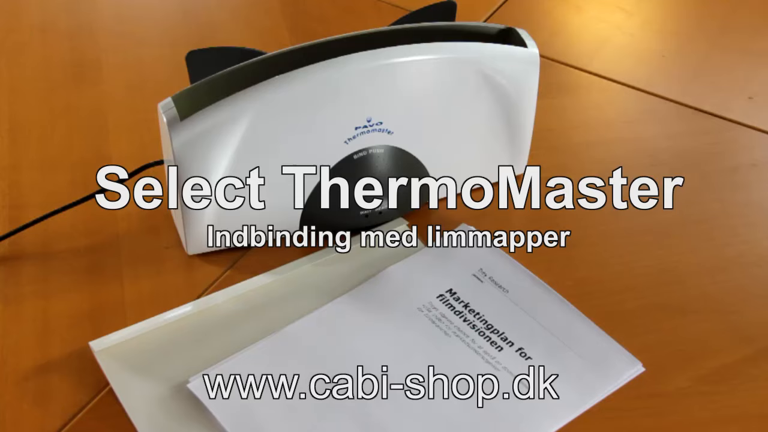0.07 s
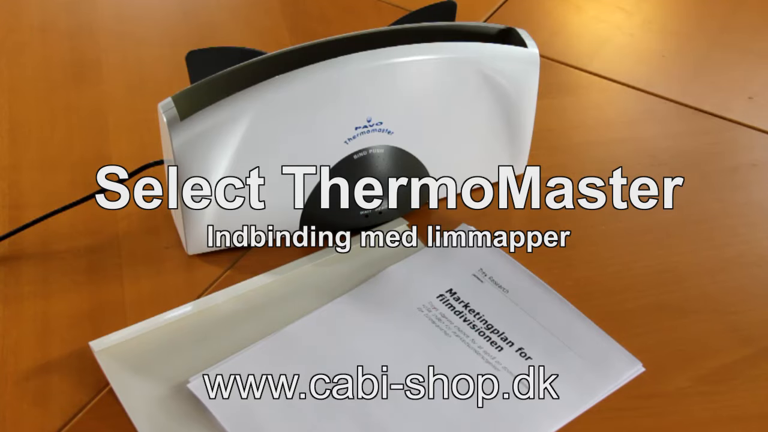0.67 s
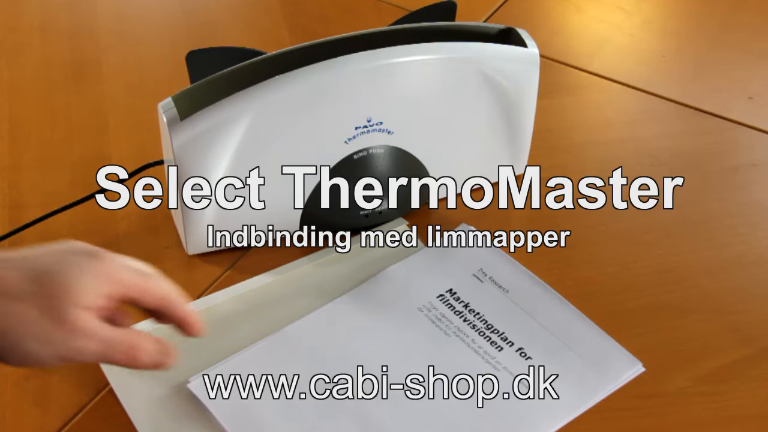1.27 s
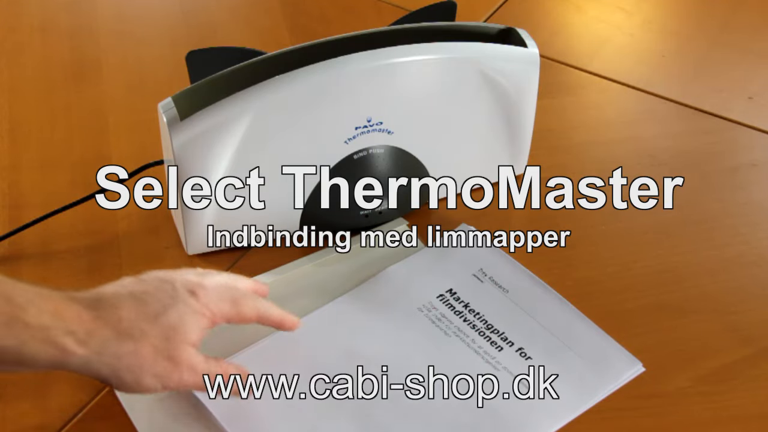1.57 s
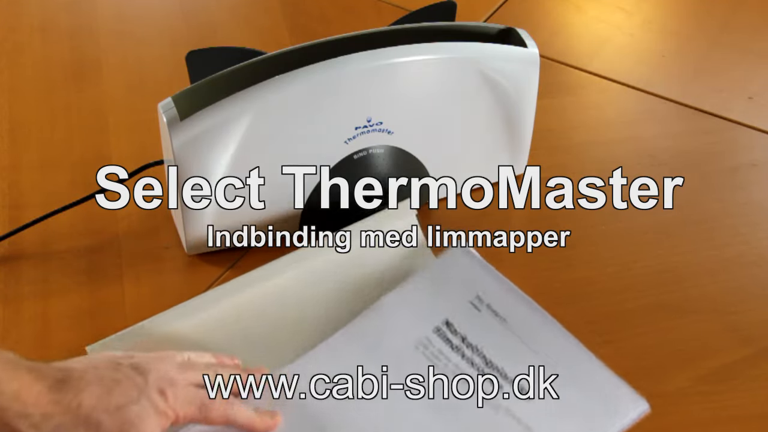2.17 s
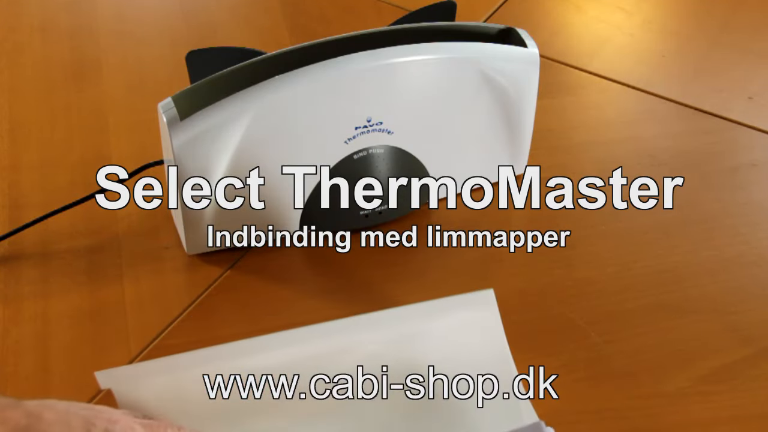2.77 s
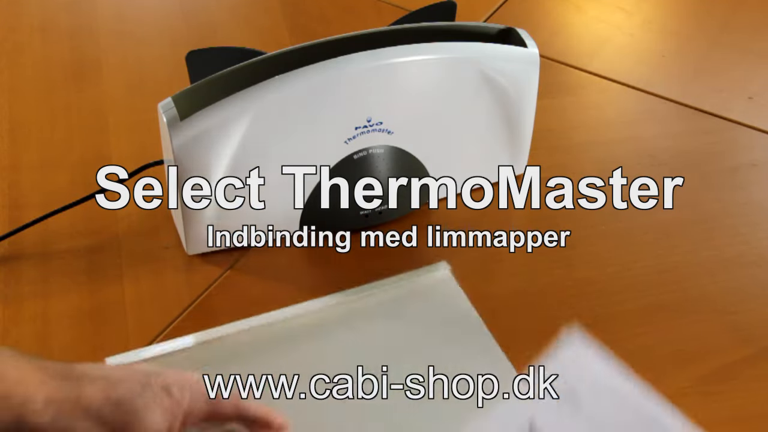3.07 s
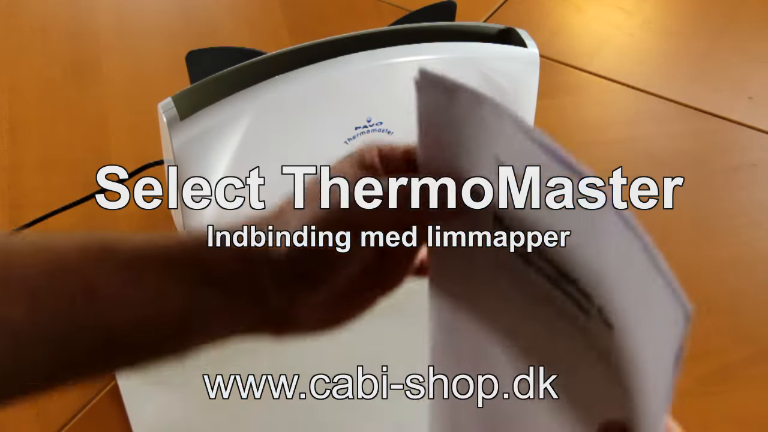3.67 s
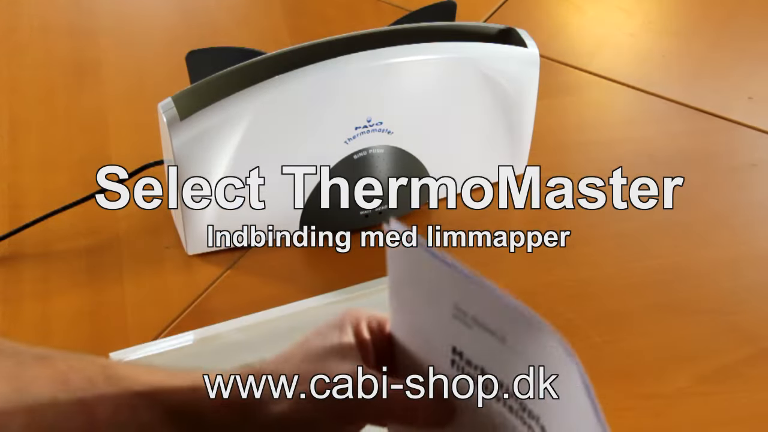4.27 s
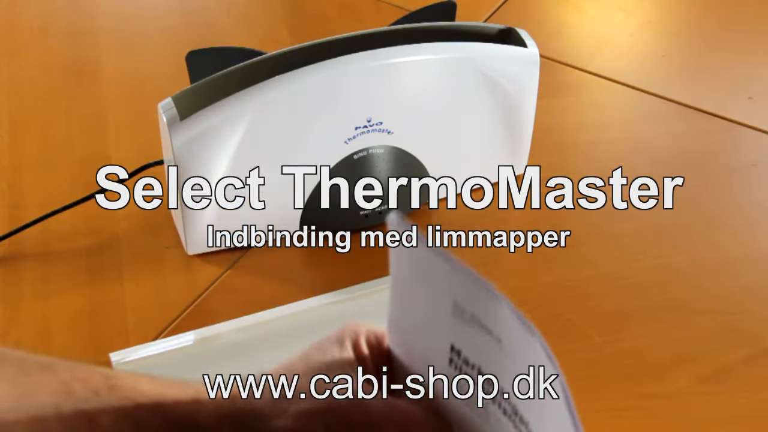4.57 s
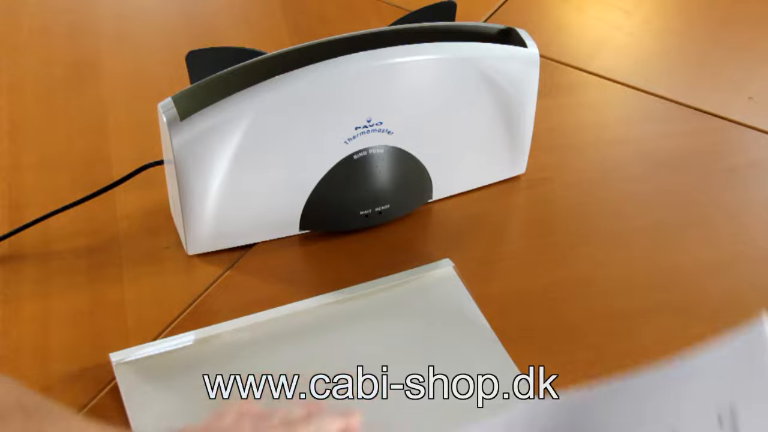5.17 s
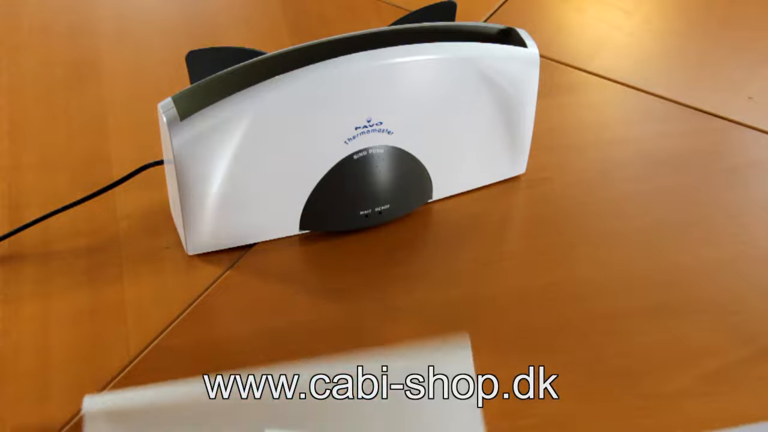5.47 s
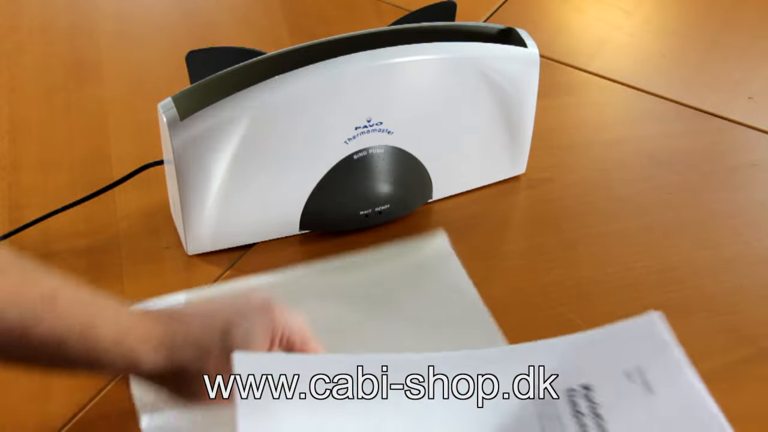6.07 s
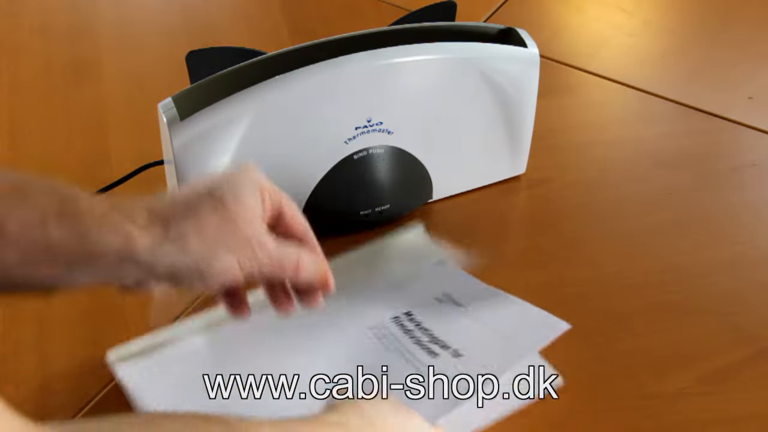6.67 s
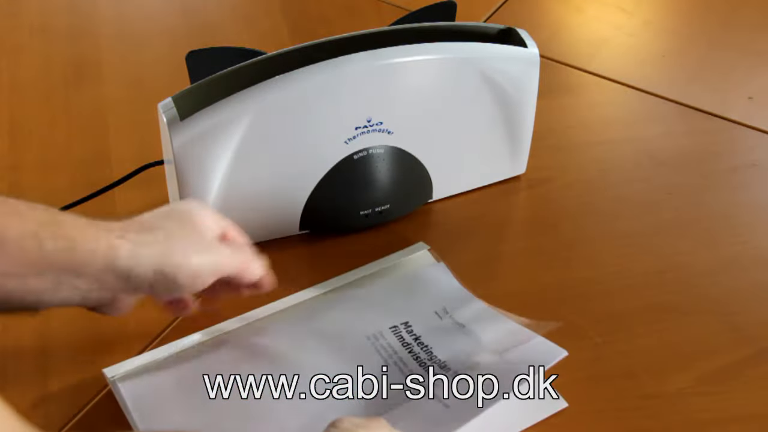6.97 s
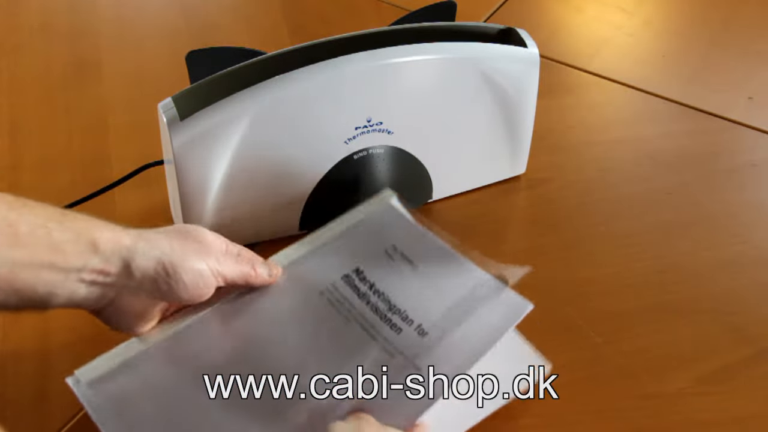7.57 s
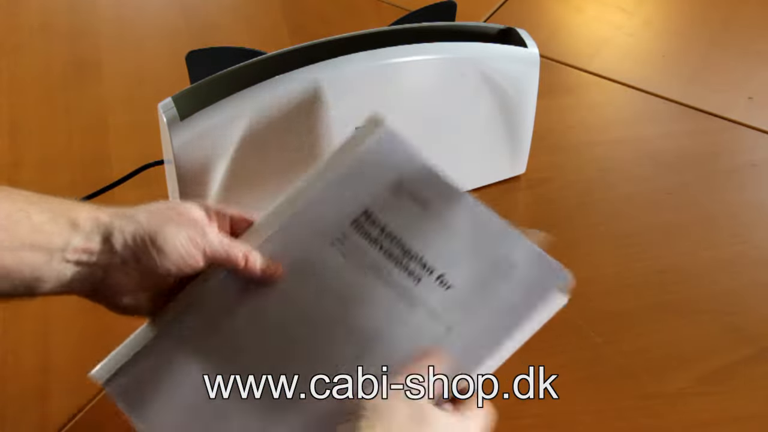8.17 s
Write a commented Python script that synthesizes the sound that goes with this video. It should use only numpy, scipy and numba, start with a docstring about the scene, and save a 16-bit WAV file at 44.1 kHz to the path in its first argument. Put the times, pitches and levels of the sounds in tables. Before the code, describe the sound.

Paper rustles and slides, then a stack of sheets is knocked four times on a wooden table in a slightly echoing room.

```python
"""A stack of paper is pulled off a plastic cover, knocked square four times on a wooden table, slid back in.
Each knock makes the table top ring, claps the air under the stack and cracks the sheet edges.
Sliding sheets rustle, hiss, whistle and tick as their fibres catch and slip.
Around it is an echoing room with ventilation noise, a machine hum and a deep drone.
An automatic volume control turns the sound down after each knock and lets it creep back."""
import sys
import numpy as np
from scipy import signal
from scipy.fft import rfft, irfft, next_fast_len
from scipy.io import wavfile
from scipy.ndimage import uniform_filter1d
from numba import njit

SR = 44100
rng = np.random.default_rng(int(sys.argv[2]) if len(sys.argv) > 2 else 0)


def store_wav(level_fs):
    """Save 16-bit WAV to argv[1]."""
    pcm = np.round(np.clip(np.atleast_2d(level_fs), -1, 1) * 32767)
    wavfile.write(sys.argv[1], SR, pcm.T.astype(np.int16))


N = 371322
T = np.arange(N) / SR

# pushes of one sheet over another: start/s, rise/s, hold/s, fade/s, relative rustle/dB, relative hiss/dB
STROKES = [(.72, 0.086, 0.024, .12, -59, -57), (.88, 0.17, 0.7, .3, -56.5, -57),
           (1.78, 0.093, .3, .2, -54, -53.5), (2.1, .24, .27, 0.33, -39.5, -42),
           (2.62, 0.046, 0.013, 0.19, -32, -41), (2.8, 0.13, .14, 0.18, -44.5, -45),
           (3.29, 0.05, 0.044, .15, -54.5, -50.5), (3.46, 0.014, 0.027, 0.12, -46, -43),
           (3.52, 0.07, .11, 0.19, -42.5, -41), (4.93, .07, 0.14, .12, -56, -46),
           (5.26, 0.24, 0.12, .2, -34.5, -39), (5.8, 0.068, .32, 0.13, -38, -36.5),
           (5.85, 0.11, .06, .35, -44.5, -35), (6.2, .07, .43, 0.088, -51, -55.5),
           (6.745, 0.01, .045, 0.094, -37, -31), (6.77, .025, 0.0062, 0.24, -36, -51),
           (7.07, .08, 0.045, 0.045, -43, -57), (7.185, .012, .14, 0.064, -37, -37.5),
           (7.2, .11, .03, 0.2, -34.5, -50), (7.52, 0.033, .015, 0.25, -43.5, -51.5),
           (7.75, .11, .03, .14, -44.5, -52), (7.93, .06, .008, .02, -34, -47.5),
           (8, 0.048, 0.092, 0.11, -48.5, -60), (8.12, 0.068, .11, .16, -44.5, -44)]


def undb(db):
    """Turn decibels into a number to multiply by."""
    return 10 ** (np.asarray(db) / 20)


def unit(x):
    """Scale a sound to an average strength (rms) of 1."""
    return x / np.sqrt(np.mean(x ** 2))


def lowpass(x, hz, order=2):
    """Soften everything above hz."""
    return signal.sosfilt(signal.butter(order, min(hz, SR / 2 - 1), fs=SR, output="sos"), x)


def highpass(x, hz, order=2):
    """Soften everything below hz."""
    return signal.sosfilt(signal.butter(order, hz, "high", fs=SR, output="sos"), x)


def colour(x, points):
    """Shape the bass and treble of a sound along a curve of points: f/Hz, level/dB."""
    hz, db = np.transpose(points)
    size = next_fast_len(len(x) + 4096, True)
    f = np.maximum(np.fft.rfftfreq(size, 1 / SR), 1)
    cepstrum = irfft(np.log(undb(np.interp(np.log(f), np.log(hz), db))), size)
    # fold it in half so that the filter rings only after a click, never before
    cepstrum[1:size // 2] *= 2
    cepstrum[size // 2 + 1:] = 0
    return irfft(rfft(x, size) * np.exp(rfft(cepstrum)), size)[:len(x)]


def wander(rate):
    """A random curve, roughly 1 in size, that heads for a new value rate times a second."""
    knots = rng.standard_normal(N // 100)
    return 1.18 * np.interp(T * rate, np.arange(len(knots)), knots)


def add(track, s, sound):
    """Mix a sound into the track at s seconds."""
    i = int(s * SR)
    track[i:i + len(sound)] += sound[:len(track) - i]


def ring(hz, t60):
    """Half a second of a tone that dies away by 60 dB in t60 seconds."""
    t = T[:SR // 2]
    return np.sin(2 * np.pi * hz * t) * np.exp(-np.log(1000) * t / t60)


def pushes(rows, column=0, rise_db=17.5, fade_db=20.5):
    """Loudness of a row of pushes: each swells by rise_db, holds, then sinks by fade_db per fade time."""
    power = np.zeros(N)
    for start, rise, hold, fade, *levels in rows:
        early = np.maximum(start + rise - T, 0) / rise
        late = np.maximum(T - start - rise - hold, 0) / fade
        power += undb(np.maximum(levels[column] - rise_db * early - fade_db * late, -150)) ** 2
    return np.sqrt(power)


def ventilation(level_db=-42):
    """Moving air makes a soft, low rush."""
    # tone colour of the air: f/Hz, relative level/dB
    air_colour = [(20, -33), (38, -27), (58, -10), (82, -23), (130, -7), (220, -3), (370, -10), (850, -12),
                  (1250, -14), (1680, -15), (2050, -21), (5000, -29), (11000, -38.5), (16000, -42)]
    return undb(level_db) * unit(colour(rng.standard_normal(N), air_colour)) * undb(0.99 * wander(16))


def machine_hum(waver_db=1, drift_hz=0.96):
    """A machine hums with a few tones that waver in loudness and pitch."""
    # tones of the hum: f/Hz, level/dB
    tones = [(120, -50), (829, -60.5), (1540, -58.5), (1663, -57.5)]
    out = np.zeros(N)
    for hz, db in tones:
        peak = np.sqrt(2) * undb(db - waver_db * wander(5))
        out += peak * np.sin(2 * np.pi * np.cumsum(hz + drift_hz * wander(8)) / SR)
    return out


def drone(mains_hz=50, mains_db=-6):
    """A deep wandering tone throbs against a mains hum; both swell and fade together."""
    # path of the deep tone: t/s, f/Hz, level/dB
    path = [(0, 54.5, -52), (2, 55, -54), (3, 57, -56), (4.8, 63.3, -51), (5.4, 63.4, -46.5),
            (6.9, 60, -49), (7.3, 60, -62), (8.42, 60, -67)]
    s, hz, db = np.transpose(path)
    tone = np.sin(2 * np.pi * np.cumsum(np.interp(T, s, hz) + wander(1.8)) / SR)
    mains = undb(mains_db) * np.sin(2 * np.pi * mains_hz * T)
    return (tone + mains) * undb(np.interp(T, s, db))


def room(x, wet_db, t60=.52, treble_t60=0.51, build_s=0.0051):
    """Bare walls send back a wash of echoes that builds quickly and dies in about half a second."""
    walls = [(45, -32), (120, -1.0), (400, -3.5), (1200, -6.5), (2500, 0), (5200, -3),
             (7500, -5.5), (16000, -2.5)]  # f/Hz, level/dB
    t = T[:SR]
    low = lowpass(rng.standard_normal(len(t)), 3740) * np.exp(-np.log(1000) * t / t60)
    high = highpass(rng.standard_normal(len(t)), 4000) * np.exp(-np.log(1000) * t / treble_t60)
    tail = (low + high) * (1 - np.exp(-t / build_s))
    tail = colour(tail / np.linalg.norm(tail), walls)
    return undb(wet_db) * signal.fftconvolve(x, tail)[:N]


def lone_tick(s=.1812, gain_db=-12, hz=6000, t60=.003, rise_s=.0008):
    """One thin, ringing tick before the hand arrives."""
    out, tone = np.zeros(N), ring(hz, t60)
    add(out, s, undb(gain_db) * tone * (1 - np.exp(-T[:len(tone)] / rise_s)))
    return out


def stray_ticks(count=36, above_db=9, scatter_db=3, centre_hz=5000, octaves=0.65):
    """Random ticks, likelier and louder where the paper rubs harder: rows of t/s, peak/dB, f/Hz."""
    rubbing = pushes(STROKES)
    place, size, pitch = rng.random((count, 3)).T
    at = np.searchsorted(np.cumsum(rubbing) / rubbing.sum(), place).clip(0, N - 1)
    db = 20 * np.log10(rubbing[at]) + above_db + scatter_db * (2 * size - 1)
    hz = centre_hz * 2 ** (octaves * (2 * pitch - 1))
    return list(zip(T[at], db, hz))


def ticks(decay_s=0.0011, min_q=2.0, snap_size=4):
    """A sheet buckles or an edge catches: a sharp click with a brief crumble after it."""
    # snaps of the paper: t/s, peak/dB, centre f/Hz
    snaps = [(2.217, -24, 1400), (2.267, -24, 1690), (2.2965, -17, 1700), (2.3175, -16, 1800),
             (2.3335, -17.5, 1700), (2.3455, -18, 1600), (2.3545, -18, 1400), (2.6695, -17, 3800),
             (3.104, -19, 8000), (3.7706, -20, 2760), (5.241, -26.5, 4400), (5.792, -18.5, 4350),
             (6.238, -23, 6600), (6.506, -31, 6050)]
    out, t = np.zeros(N), T[:SR // 50]
    for s, db, hz in snaps + stray_ticks():
        snap = rng.standard_normal(len(t)) * np.exp(-t / decay_s)
        snap[0] = snap_size
        resonance = signal.iirpeak(hz, max(min_q, 4 * hz / SR), fs=SR)
        click = signal.lfilter(*resonance, snap)
        add(out, s, click / np.abs(click).max() * undb(db))
    return out


def zips():
    """A sheet edge sticks and slips very fast: a rough whistle whose pitch slides with its speed."""
    # runs of an edge over paper grain: start/s, length/s, first f/Hz, last f/Hz, roughness/Hz, level/dB
    runs = [(1.644, .13, 3940, 4030, 250, -53), (2.345, 0.2, 6550, 6240, 400, -46),
            (5.286, 0.25, 3820, 3000, 300, -47.5), (5.388, .1, 4100, 4420, 220, -40.5),
            (5.843, 0.13, 3570, 3520, 300, -43.5), (6.014, 0.062, 3400, 4830, 150, -37.5),
            (6.089, 0.103, 5850, 6140, 300, -41), (6.75, .075, 4270, 3300, 800, -36),
            (7.267, .076, 4100, 3300, 800, -38)]
    out = np.zeros(N)
    for start, length, first_hz, last_hz, rough_hz, db in runs:
        progress = np.linspace(0, 1, int(length * SR))
        rough = unit(lowpass(rng.standard_normal(SR), rough_hz))[:len(progress)]
        whistle = np.sin(2 * np.pi * np.cumsum(first_hz + (last_hz - first_hz) * progress) / SR)
        swell = np.sqrt(np.abs(np.sin(np.pi * progress)))
        add(out, start, 2 * undb(db) * swell * rough * whistle)
    return out


def friction(points, grain_db, flutter_db):
    """Paper fibres make countless tiny slips of uneven size while the hand's pressure flutters."""
    sizes = undb(grain_db * np.minimum(rng.exponential(size=N // 16 + 1), 4.5))
    slips = rng.standard_normal(N) * np.repeat(sizes, 16)[:N]
    return unit(colour(slips, points) * undb(flutter_db * wander(70)))


def flex(x, depth_db=1.2, rate=14, count=12):
    """Sheets bend as they slide, so each band of pitch swells and sinks on its own."""
    size = next_fast_len(N, True)
    spectrum = rfft(x, size)
    octave = np.log2(np.fft.rfftfreq(size, 1 / SR) + 1)
    centres = np.log2(np.geomspace(700, 14000, count))
    bands = (irfft(spectrum * np.interp(octave, centres, pick), size)[:N] for pick in np.eye(count))
    return sum(band * undb(depth_db * wander(rate)) for band in bands)


def sliding(rustle_db=1.3, hiss_db=-.3, drag_db=-1, pressure_db=.4):
    """Sheets rustle and hiss over each other, the stack drags lower, and the hand presses unevenly."""
    # tone colours of four kinds of rubbing: f/Hz, relative level/dB
    rustle_colour = [(300, -9), (900, -4), (1800, 2), (2700, -0.5), (3700, 2), (5500, -6), (7500, -10),
                     (16000, -17.5)]
    hiss_colour = [(2000, -23), (5000, 1), (7000, -2), (10000, -4), (13000, -5), (16500, -17)]
    silk_colour = [(7000, -25), (11500, -4), (13500, 0), (16000, -4)]
    drag_colour = [(100, -18), (250, -3), (600, 7.5), (1000, 8), (1600, 8.5), (2400, 1.5), (5000, -46)]
    # smooth faces glide with a silky sound: start/s, rise/s, hold/s, fade/s, level/dB
    glides = [(3.5, .1, .11, .12, -50), (5.38, .16, .08, .12, -47), (5.83, .14, .23, .08, -43)]
    # the stack's weight drags on the table: start/s, rise/s, hold/s, fade/s, relative level/dB
    drags = [(2.2, 0.12, .02, 0.15, -32), (2.38, .08, 0.091, 0.35, -36.5), (6.78, .03, 0.12, 0.49, -43),
             (7.31, 0.02, 0.028, 0.2, -40), (8.08, 0.19, .06, 0.11, -40.5)]
    rustle = undb(rustle_db) * friction(rustle_colour, grain_db=2.2, flutter_db=0.94) * pushes(STROKES)
    hiss = undb(hiss_db) * friction(hiss_colour, grain_db=2.3, flutter_db=1.3) * pushes(STROKES, column=1)
    silk = friction(silk_colour, grain_db=2.2, flutter_db=1.5) * pushes(glides)
    drag = undb(drag_db) * friction(drag_colour, grain_db=3.0, flutter_db=2.2) * pushes(drags)
    return flex(rustle + hiss + silk + drag) * undb(pressure_db * wander(17))


def blows(contact_ms=0.72, low_hz=350, crack_ms=1.9, top_hz=4500):
    """List every blow on the table, with relative levels; the light bumps share the settings above."""
    # the stack lands, one corner first and the rest just after: t/s, wood/dB, contact/ms,
    # bass limit/Hz, clap/dB, clap f/Hz, crack/dB, crack decay/ms, crack treble limit/Hz
    landings = [(3.8886, -4.5, .98, 146, -22, 1640, 1, 1.7, 12000),
                (3.9108, -9.5, 0.29, 300, 10, 1140, -18, 7.4, 6000),
                (4.2055, -14, 0.41, 350, -26, 1387, -16.5, 9, 10000),
                (4.218, 0.5, 0.56, 580, 10.5, 1320, -9, 4.9, 1200),
                (4.4383, 5, 1, 256, 8, 1380, -6, 2.3, 9100),
                (4.4654, -11.5, 0.49, 300, 10, 1450, -39, 2.4, 3000),
                (4.6709, 4, 0.36, 266, 20, 1300, -1, 2.45, 3500),
                (4.6928, -6.5, 1, 307, -5, 1030, -19, 1.6, 4000)]
    # the cover and the hand bump the table: t/s, wood/dB, clap/dB, clap f/Hz, crack/dB
    bumps = [(3.083, -25, -32, 1290, -34), (6.592, -23, -25, 900, -51), (6.7953, -19.5, -29, 1520, -23),
             (7.3365, -27.5, -14, 1590, -26), (7.402, -45, -20, 1770, -21), (7.483, -24, -21, 1410, -32),
             (7.9979, -20.5, -7.5, 890, -24), (8.1375, -36, -18, 1500, -30)]
    return landings + [(s, wood_db, contact_ms, low_hz, clap_db, clap_hz, crack_db, crack_ms, top_hz)
                       for s, wood_db, clap_db, clap_hz, crack_db in bumps]


def knocks(clap_t60=0.0069, clap_rise_s=0.00055, scatter_db=3, puff_db=-49, bass_cut_hz=130, edges_db=7):
    """Wood rings, trapped air claps, edges crack. Returns the direct sound and what reaches the walls."""
    # ringing tones of the table top: f/Hz, relative level/dB, time to fade by 60 dB/s
    wood_tones = [(173, -15.5, 0.22), (223, -18, 0.026), (319, -19, 0.1), (405, -17, 0.096),
                  (504, -13, 0.064), (620, -11, 0.05), (744, -12, 0.11), (807, -15.5, 0.13),
                  (900, -14.5, 0.1), (1222, -14.5, 0.091), (1398, -13, 0.069), (1639, -3, 0.057),
                  (1930, 2, 0.016), (2390, -4.5, 0.014), (3500, -5, 0.012)]
    # tone colour of sheet edges striking: f/Hz, relative level/dB
    crack_colour = [(70, -22), (300, -14), (1000, 0), (2000, 1), (2900, -1.5), (3500, -0.5), (4500, 0),
                    (5700, -3.5), (7000, -8.5), (9000, -11.5), (13000, -16), (16000, -18)]
    body, edges, wall_edges = np.zeros((3, N))
    t = T[:SR // 2]
    ms = t * 1000
    wood_hz = np.array(wood_tones)[:, 0]
    rings = np.array([(-1) ** k * undb(db) * ring(hz, t60) for k, (hz, db, t60) in enumerate(wood_tones)])
    for s, wood_db, contact_ms, low_hz, clap_db, clap_hz, crack_db, crack_ms, top_hz in blows():
        # each spot on the table has its own mix of tones
        spot = undb(scatter_db * (2 * rng.random(len(wood_hz)) - 1))
        # a glancing blow leaves the low tones still, a long contact the high ones
        wood = spot / np.sqrt(1 + (low_hz / wood_hz) ** 6) @ rings
        push = ms * np.exp(-2 * np.pi * ms / contact_ms)
        thud = undb(wood_db) * signal.fftconvolve(wood, push / push.sum())[:len(t)]
        clap = undb(clap_db) * ring(clap_hz, clap_t60) * (1 - np.exp(-t / clap_rise_s))
        puff = undb(clap_db + puff_db) * ring(hz=85, t60=.03)  # air pushed out by a flat landing
        add(body, s, highpass(thud + clap, bass_cut_hz) + puff)
        fade = undb(crack_db) * np.exp(-ms / crack_ms)
        add(edges, s, lowpass(fade * rng.choice([-1, 1], len(t)), top_hz, order=1))
        # summed over all directions, the edges act as one clean click of the same energy
        click = np.linalg.norm(fade) * (t == 0)
        add(wall_edges, s, lowpass(click, top_hz, order=1))
    direct = body + undb(edges_db) * colour(edges, crack_colour)
    to_walls = body + undb(edges_db) * colour(wall_edges, crack_colour)
    return direct, to_walls


def scene():
    """Knocks and sliding paper with their echoes, over the room's background."""
    direct, to_walls = knocks()
    paper = sliding() + zips() + ticks() + lone_tick()
    echoes = room(to_walls, wet_db=1.5) + room(paper, wet_db=-5.5)
    return (direct + paper + echoes + ventilation() + machine_hum() + drone())[None]


@njit
def follow(x, rise_s, fall_s):
    """Follow a level smoothly, with one delay for going up and one for coming down."""
    out, level = np.empty(len(x)), 0.
    for i in range(len(x)):
        level += (x[i] - level) / (SR * (rise_s if x[i] > level else fall_s))
        out[i] = level
    return out


def volume_control(x, threshold_db=-16, slope=.5, attack_s=.0002, release_s=1.1, lag_s=.009):
    """Loud blows pull the volume down just after their first peak; it creeps back in a second or two."""
    # the level is capped at 1, so every hard knock brings about the same dip
    level = follow(np.minimum(np.abs(x), 1), attack_s, release_s)
    cut = 1 - np.maximum(level / undb(threshold_db), 1) ** -slope
    return x * (1 - follow(cut, lag_s, lag_s))


def record(dry, top_hz=15750):
    """Control the volume, flatten the hardest peaks, stutter at the start and cut the highest treble."""
    # the sound cuts in, drops out briefly and returns: on/s, off/s
    on_times = [(.058, .095), (.162, 9)]
    switch = sum(1. * ((T > on) & (T < off)) for on, off in on_times)
    x = np.clip(volume_control(dry[0]), -1, 1) * uniform_filter1d(switch, SR // 500)
    return signal.sosfilt(signal.ellip(12, .1, 100, top_hz, fs=SR, output="sos"), x)[None]


dry = scene()
out = record(dry)
store_wav(out)
```